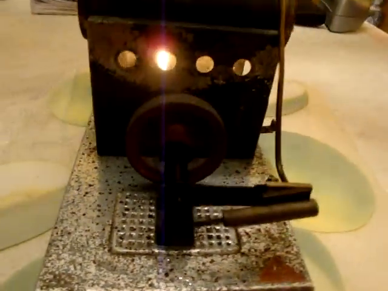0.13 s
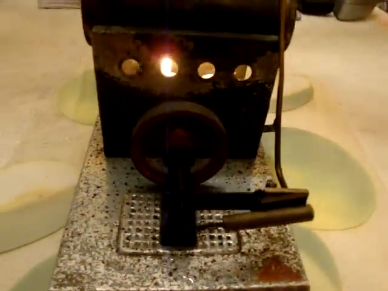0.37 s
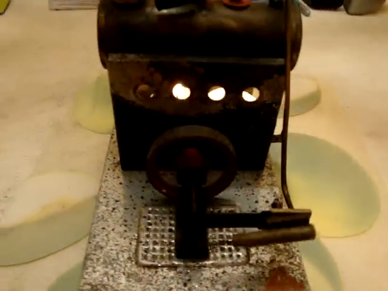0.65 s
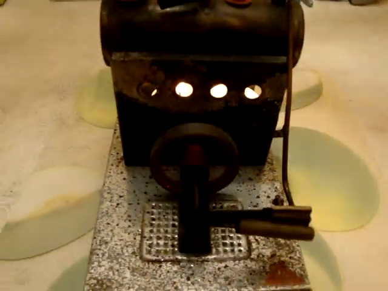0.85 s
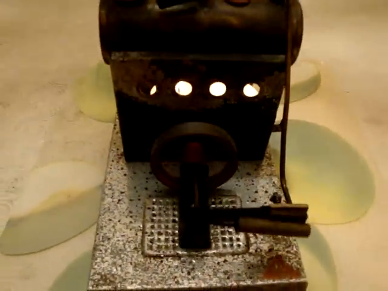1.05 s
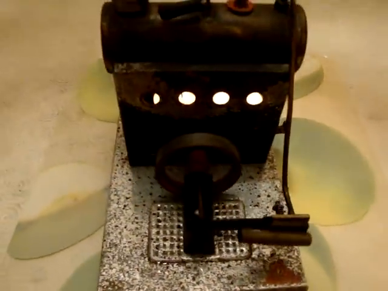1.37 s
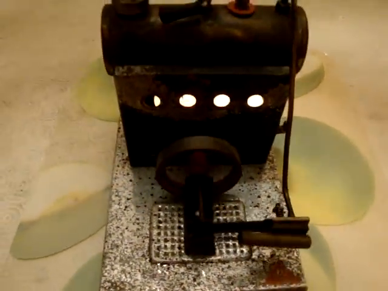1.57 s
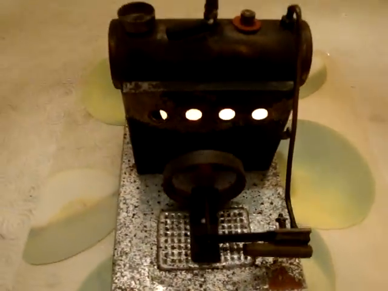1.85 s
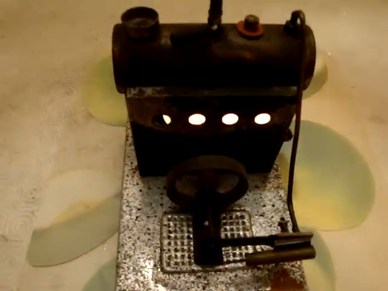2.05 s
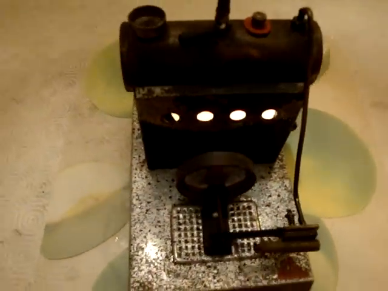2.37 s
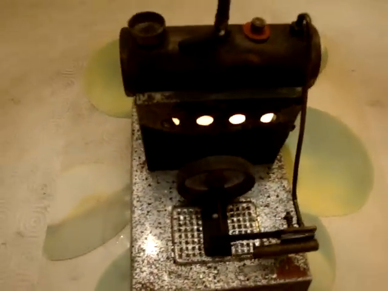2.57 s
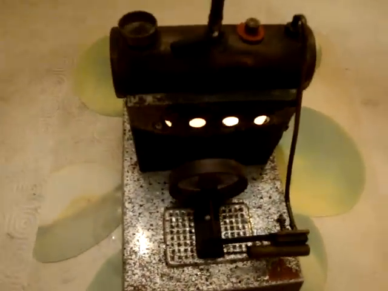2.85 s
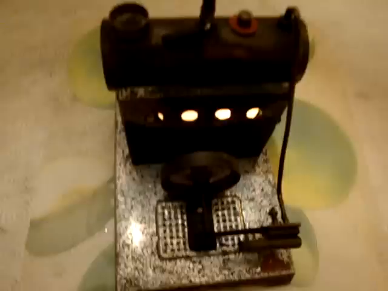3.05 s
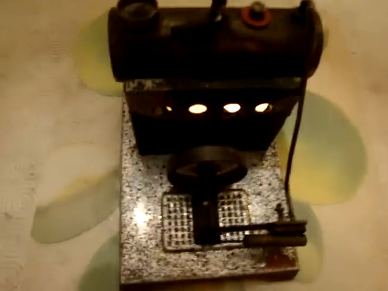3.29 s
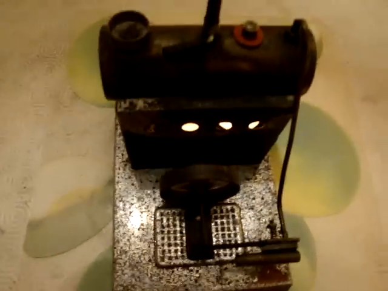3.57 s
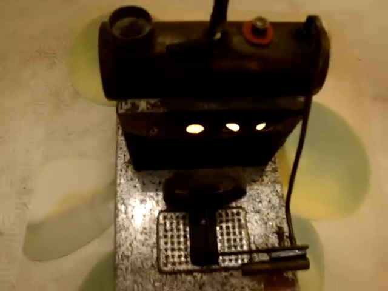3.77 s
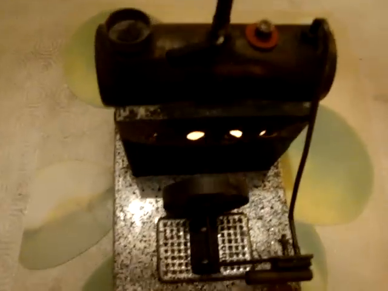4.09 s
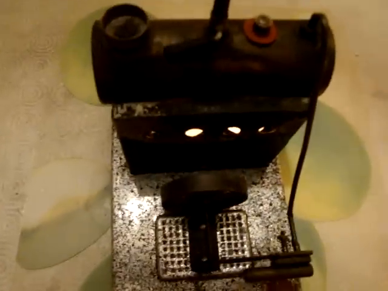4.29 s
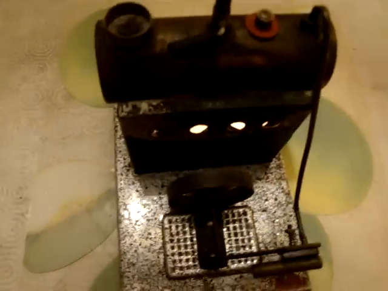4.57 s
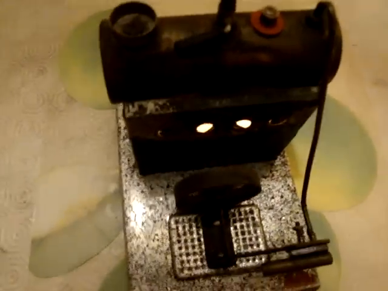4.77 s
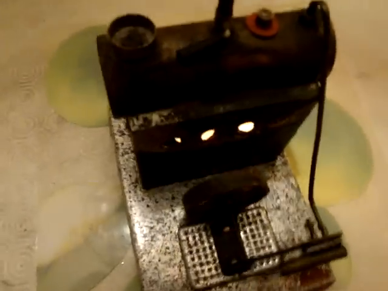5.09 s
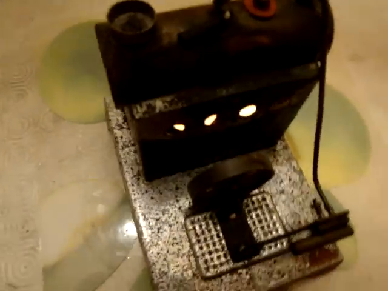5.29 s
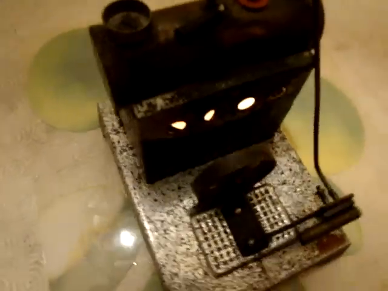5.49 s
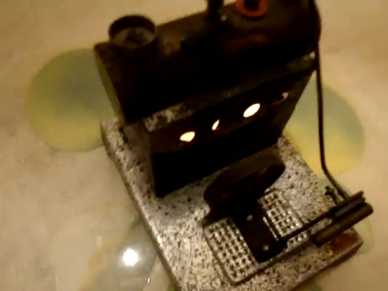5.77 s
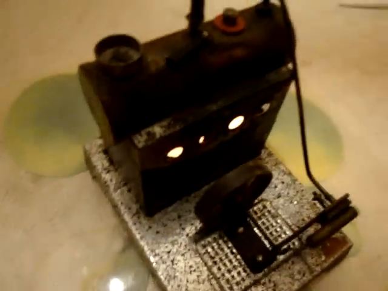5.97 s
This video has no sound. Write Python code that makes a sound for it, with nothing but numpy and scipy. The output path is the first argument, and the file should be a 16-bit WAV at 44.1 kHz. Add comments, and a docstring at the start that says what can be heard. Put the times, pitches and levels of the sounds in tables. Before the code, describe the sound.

Close, dry-sounding chatter of a little tin steam engine: about eight and a half sharp chuffs a second, rising gradually past nine. Wet, spluttery and clanky at first, softer steam in the middle, then stronger, brighter spits and ringing metal knocks from about four seconds. Scraping and slack rattling fill the gaps, over thin hiss and quiet low rumble in a small room.

```python
"""A toy steam engine on a table, heard from close by in a small room, turning 8.6 times a second at first.
From the start slack joints clack and scrape, ringing the tin; water splutters; hiss and rumble lie behind.
Then on each turn the port of the rocking cylinder spits steam (shaped noise), puffs out the rest, and the
piston knocks the loose crank, ringing base and firebox (decaying sines). Dull bumps come from one second on,
softer return pings from one and a half; a ringing cylinder wall peaks near four; at the end 9.6 turns a second."""
import sys
import numpy as np
from scipy import signal
from scipy.fft import rfft, irfft
from scipy.io import wavfile

SR = 44100
rng = np.random.default_rng(int(sys.argv[2]) if len(sys.argv) > 2 else 0)


def waveform_to_disk(signal):
    """Save audio, clipped to [-1, 1], as 16-bit WAV at the path in sys.argv[1]."""
    frames = np.transpose(np.atleast_2d(signal))
    scaled = np.clip(frames, -1, 1) * 32767
    samples = np.round(scaled).astype(np.int16)
    wavfile.write(sys.argv[1], SR, samples)


N = 270765
TIME = np.arange(N) / SR

# Flywheel speed. Each row: time in seconds, turns per second.
SPEED = [(0, 8.568), (.6, 8.657), (1.2, 8.766), (2.2, 8.972), (3.2, 9.102), (4, 9.249), (4.8, 9.209),
         (6.14, 9.556)]
FIRST_PORT_S = .0876   # the port first opens; turns are counted from here

# Tin base plate, firebox and boiler modes. Each row: pitch in Hz, width in Hz, relative level in dB.
TIN_MODES = [(670, 130, -12), (704, 20, -14.5), (973.7, 45.5, 1), (1047, 47, -10), (1112, 60, -4.5),
             (1446, 66, -9.5), (1530, 800, -28), (1521, 93, -6), (1628, 87, -3.5), (2000, 152, -8.5),
             (2164, 82, -12.5), (2424, 71, -12.5), (2680, 270, -16), (2930, 54, -19), (3446, 54, -19.5),
             (4220, 67, -31), (4240, 170, -41.5), (5300, 550, -41), (5330, 63, -45.5), (6130, 35, -40)]
# Pitches at which the plates cancel each other. Each row: pitch in Hz, width in Hz, depth in dB.
HOLLOWS = [(1867, 154, -16), (3125, 460, -5.5)]

# Friction round the turn. Each row: share of a turn after the port opens, dB at the start,
# dB towards which it moves with speed.
CRANK_FRICTION = [(0, 2, 3), (0.099, -3, 2.5), (0.201, -1.5, 1.5), (0.258, 0, -7), (0.317, 0, -3.5),
                  (0.437, 0.5, -1.5), (.54, -5, -6), (.63, -3.5, -8.5), (0.721, 1.5, -4.5),
                  (0.799, -5.5, 3), (0.869, -7, 3.5), (.94, -4, -6)]
# Rubbing of the cylinder face and bearings. Each row: time in seconds, level in dB before filtering.
RUBBING = [(0, -44.5), (1.1, -40.5), (2, -41.5), (3, -41.5), (4, -40), (5, -39), (6.14, -42)]
CLUMP_S, CLUMP_DB = .004, 7   # length and swing of the bunches of slips
SLIPS_PER_S, SLIP_SPREAD_DB = 1300, 16   # mean rate and spread of sizes

# Colour of the wet sputter. Each row: pitch in Hz, relative density in dB per Hz.
SPUTTER_COLOUR = [(1500, 11), (2400, 15.5), (3300, 9.5), (4400, 5), (5800, 0.5), (7500, -2), (10000, -25)]
# Slugs of water from the port face. Each row: time of the peak in seconds, level in dB before the
# crackle, fall in seconds.
WATER_SLUGS = [(0.012, -35, 0.0018), (0.083, -36, 0.0027), (0.183, -38, 0.0029), (0.211, -45, 0.0026),
               (0.229, -51, 0.002), (0.244, -33, 0.002), (0.342, -34.5, 0.0026), (0.459, -39, 0.0022),
               (0.574, -35.5, 0.0037), (0.677, -42, 0.0047), (0.694, -45, 0.0022), (0.706, -34.5, 0.0026),
               (0.809, -42, 0.0012), (0.878, -36, 0.0017), (1.035, -41, 0.0028), (1.151, -35, 0.0021),
               (1.265, -38.5, 0.0022), (1.279, -38, 0.0027), (1.338, -37, 0.0016), (1.563, -35, 0.0013),
               (1.719, -37, 0.0016), (1.926, -54, 0.005), (4.021, -32.5, 0.0023), (4.113, -33, 0.002),
               (4.126, -34, 0.0031), (4.21, -40.5, 0.0016), (4.222, -41, 0.0024), (4.343, -41, 0.0035),
               (4.716, -54, 0.0018), (4.767, -34, 0.0028), (4.777, -24.5, 0.0024), (4.86, -35.5, 0.0033),
               (5.214, -47, 0.0026), (5.398, -51, 0.0014), (5.927, -50, 0.0016)]

# Colour of the boiler hiss. Each row: pitch in Hz, relative density in dB per Hz.
BOILER_COLOUR = [(1500, 26), (2500, 32.5), (4000, 21.5), (6000, -10), (8000, -21), (10000, -13)]
# Boiler hiss. Each row: time in seconds, level in dB before a gain that depends on the crank angle.
BOILER_HISS = [(0, -69), (1.1, -58.5), (3, -58), (4, -56.5), (6.14, -59)]
# Colour of the thin background hiss. Each row: pitch in Hz, relative density in dB per Hz.
THIN_HISS_COLOUR = [(3000, 0), (10000, -1), (11000, -40)]
THIN_HISS_DB = -63.5   # before it wavers
WAVER_DB, WAVERS_PER_S = 1.8, 70   # scale and rate of the thin hiss's wavering

# Colour of the table's drone. Each row: pitch in Hz, relative density in dB per Hz.
DRONE_COLOUR = [(52, -7.5), (72, 8), (95, -8), (120, 5.5), (170, -11.5), (300, -11), (600, -49)]
# Level of the drone in dB, when slow and at full speed.
DRONE_DB = (-82, -69.5)
# Colour of the room's rumble. Each row: pitch in Hz, relative density in dB per Hz.
RUMBLE_COLOUR = [(25, -27), (45, -22.5), (58, -11), (75, -8), (95, -14), (120, -5), (180, -3.5),
                 (240, -2.5), (282, 6), (330, -0.5), (376, 0.5), (440, -1), (600, 0), (1200, -45.5)]
RUMBLE_DB = -57.5

# Light clacks of the slack joints, at the same places in every turn. Each row: share of a turn,
# ring in dB slow, ring in dB fast, clank in dB slow, clank in dB fast.
LIGHT_CLACKS = [(.195, -41.5, -34, -32.5, -46), (.28, -39.5, -47.5, -38, -46), (.675, -60, -43, -54, -40),
                (.76, -52, -36, -59, -38.5), (.828, -55, -38, -35, -41.5), (.9, -30, -41, -38.5, -38)]
# Hard clacks of the slack joints. Each row: time in seconds, ring in dB, clank in dB.
HARD_CLACKS = [(0.0275, -35.5, -41), (0.0762, -33, -32.5), (0.1092, -36, -32), (0.1668, -50.0, -31.0),
               (0.1833, -46, -37), (0.1922, -35, -29), (0.2283, -46, -28), (0.2435, -46, -35),
               (0.2606, -35, -41), (0.3085, -38, -28.5), (0.3425, -33, -31), (0.3995, -50.0, -31),
               (0.4242, -39, -23), (0.4582, -50.0, -35), (0.4929, -34.0, -46), (0.5121, -36, -32.5),
               (0.5221, -38.0, -50.0), (0.5401, -37, -28), (0.5744, -32, -30), (0.5835, -42, -40),
               (0.6303, -42, -30.5), (0.6383, -36, -50.0), (0.6552, -38.0, -37), (0.6911, -43, -33),
               (0.6999, -39, -38), (0.7246, -35, -35), (0.7705, -39, -34.0), (0.8053, -35, -31.0),
               (0.8139, -44, -42.0), (0.8612, -36, -36), (0.8749, -44, -38.0), (0.8852, -37, -33),
               (1.0002, -29, -34), (1.0343, -36, -28.5), (1.0906, -38, -32), (1.1025, -52, -31),
               (1.1151, -30, -31), (1.1617, -35, -36), (1.2319, -31.5, -48), (1.2636, -39, -31),
               (1.3187, -31.5, -33), (1.3348, -36, -27), (1.3431, -41.0, -37), (1.3724, -39, -37),
               (1.3879, -44, -38.0), (1.4111, -39, -50.0), (1.4569, -46, -33.0), (1.4905, -42, -32.0),
               (1.5456, -52, -33), (1.5549, -36, -45), (1.5696, -44, -35.0), (1.6142, -53, -36.5),
               (1.6554, -48, -36), (1.67, -50.0, -44), (1.6823, -40, -31.0), (1.7168, -37, -30.5),
               (1.7254, -40, -50.0), (1.7719, -38.0, -31), (1.795, -51, -30.5), (1.9416, -36, -30),
               (1.9531, -30.5, -50.0), (1.9947, -46, -34), (2.0224, -31, -50.0), (2.0631, -48, -33),
               (2.1048, -47, -36), (2.1327, -37, -47), (2.1657, -52, -33), (2.1901, -39, -50.0),
               (2.2446, -37, -50.0), (2.3314, -38, -50.0), (2.3539, -34, -32), (2.4659, -36, -41),
               (2.5006, -53, -35), (2.6619, -51, -36.5), (2.6869, -49, -37.0), (2.7224, -32, -50.0),
               (2.7727, -39, -38), (2.7973, -37, -39.0), (2.8321, -36, -40.0), (2.8559, -35, -50.0),
               (2.8823, -45, -36), (2.9419, -45, -33), (2.9508, -33, -54), (2.9658, -41, -53),
               (3.0051, -37.0, -50.0), (3.0522, -38, -40.0), (3.115, -39, -52), (3.1722, -34.0, -46),
               (3.2119, -48, -39), (3.2372, -46, -32), (3.2717, -34, -50.0), (3.2784, -31, -50.0),
               (3.3408, -35, -37), (3.3892, -33, -38), (3.4312, -44.0, -37), (3.4877, -41, -57),
               (3.498, -39, -56), (3.5508, -37, -53), (3.5593, -39, -31), (3.5955, -31, -52),
               (3.6078, -33, -50.0), (3.6511, -42, -42), (3.6731, -43.0, -33), (3.7039, -35, -38),
               (3.7671, -33, -50.0), (3.7759, -33, -34), (3.8754, -32, -48), (3.8872, -35, -30.5),
               (3.9331, -31, -48), (3.9834, -35, -54), (3.9924, -30.0, -33), (4.0394, -39, -40.5),
               (4.0544, -32, -43.0), (4.0976, -32, -31), (4.1519, -34.5, -50.0), (4.195, -49.5, -34),
               (4.2077, -32.0, -28.5), (4.214, -30.5, -39), (4.2452, -34, -47), (4.2541, -36, -50.0),
               (4.265, -29.5, -47), (4.31, -36, -47), (4.3285, -33, -41), (4.4213, -49, -39),
               (4.4644, -34.0, -52), (4.4721, -35.0, -47), (4.5341, -28, -33), (4.5458, -34.0, -48),
               (4.5845, -36, -41), (4.6479, -36, -33), (4.6908, -35, -52), (4.7426, -34, -46),
               (4.7611, -32, -38), (4.8011, -32, -50.0), (4.8553, -29, -42), (4.8682, -28, -32),
               (4.909, -39, -37), (4.9503, -38, -35), (5.0679, -29, -50.0), (5.0784, -28.0, -37),
               (5.1141, -36.0, -45), (5.1233, -35.5, -48), (5.1364, -38, -46), (5.1832, -33, -36),
               (5.2203, -33, -42), (5.2336, -33.5, -43), (5.2745, -35, -42), (5.2897, -33, -35),
               (5.3517, -31, -50.0), (5.3899, -33, -36.0), (5.3974, -36, -29), (5.5037, -32, -30.5),
               (5.5415, -35, -50.0), (5.5525, -37, -37.0), (5.5655, -31, -50.0), (5.6045, -39, -35.0),
               (5.6119, -27, -49), (5.6481, -30, -50.0), (5.7103, -36.0, -33), (5.7174, -27, -31.0),
               (5.7287, -45, -35), (5.7641, -47, -50.0), (5.8235, -27, -36), (5.9217, -37.0, -36),
               (5.9287, -26.5, -32), (5.975, -39, -52), (5.9892, -35, -50.0), (6.0336, -24.0, -32),
               (6.0811, -33.5, -46), (6.134, -30, -30)]

# Colour of the gasp as the port closes. Each row: pitch in Hz, relative density in dB per Hz.
GASP_COLOUR = [(2000, -8), (2800, 3.5), (3600, -3), (4500, -6.5), (7000, -9.5)]

# Power strokes. Each row: port opening in seconds, steam rush in dB, steam sizzle in dB, the piston's wait
# in seconds, thud in dB, ring in dB, clank in dB, rebound in dB, rebound delay in seconds.
STROKES = [(0.087, -19.5, -23.5, 0.0015, -23, -54, -17.0, -30.5, 0.00476),
           (0.2048, -18, -24, 0, -46, -40, -20, -25, 0.0048),
           (0.319, -22.5, -25, 0.0013, -23, -34, -21.5, -28.5, 0.00511),
           (0.4353, -23, -24.5, 0.0032, -40.0, -30, -25, -29, 0.00494),
           (0.5512, -27.0, -30.5, 0.0043, -39, -26.5, -23.5, -34, 0.00511),
           (0.6682, -21.5, -32, 0.00075, -25, -36, -24, -30, 0.00505),
           (0.7818, -26, -30.5, 0.0018, -28, -27.0, -27, -32, 0.0049),
           (0.8973, -27, -29.5, 0.0015, -42, -28.5, -22.5, -32, 0.00501),
           (1.0124, -25.5, -28.5, 0.0015, -47, -27.5, -29, -30, 0.00484),
           (1.1278, -29.5, -35, 0.0012, -22, -25, -34, -30, 0.00511),
           (1.2409, -26.5, -30.5, 0.0068, -43, -29, -33, -33, 0.00664),
           (1.354, -28, -33.5, 0.0025, -30, -32, -24.5, -37, 0.00535),
           (1.4682, -26, -31.5, 0.0, -27.0, -30.5, -33, -29.5, 0.00529),
           (1.5809, -28.5, -28.5, 0.0011, -22, -35, -24.5, -36, 0.00539),
           (1.694, -28, -27.5, 0.00041, -42, -27, -31.0, -26.0, 0.00535),
           (1.807, -29.0, -30.5, 0.0, -24, -27, -28.5, -28, 0.00456),
           (1.9194, -27.5, -27, 0.00049, -38, -23.5, -23.5, -33, 0.00535),
           (2.0313, -27, -28.5, 0, -37, -24.5, -24, -24.5, 0.00515),
           (2.1432, -31.0, -28, 0, -36, -23, -28, -23.5, 0.00535),
           (2.2552, -27, -28, 0, -27, -25, -30.0, -29.5, 0.00515),
           (2.3664, -33.0, -33, 0.00074, -42, -26.5, -27.5, -29.5, 0.00724),
           (2.477, -38, -28.5, 0.0032, -30.0, -22, -26, -32, 0.00525),
           (2.588, -34.0, -32, 0.0018, -22, -25, -29, -40, 0.00535),
           (2.6996, -33.0, -29, 0.0013, -26.0, -28.5, -25.5, -32, 0.00475),
           (2.8092, -31, -25, 0.0027, -33, -22.5, -24, -47, 0.00539),
           (2.92, -28.5, -27, 0.0038, -40.0, -25, -25.5, -37, 0.00535),
           (3.03, -31, -28.5, 0.0024, -24, -29.5, -27.0, -27.5, 0.00576),
           (3.1402, -27.5, -28, 0.0038, -29.5, -26, -28.5, -31, 0.0063),
           (3.25, -34, -30, 0.0036, -19, -33, -25, -29, 0.00664),
           (3.359, -31, -31, 0, -18, -25.5, -24.5, -41, 0.00529),
           (3.4675, -30, -29, 0.0018, -19.5, -32.0, -29.0, -26.5, 0.00674),
           (3.5773, -23, -24.5, 0.0028, -24, -22, -23.5, -34.5, 0.00519),
           (3.6857, -24.5, -26, 0.0028, -17.5, -24, -23.5, -36.5, 0.00476),
           (3.795, -22, -26, 0.0027, -34.5, -22.5, -25.5, -31, 0.00521),
           (3.9024, -24, -22.5, 0.00071, -14.5, -33, -22, -29.0, 0.00515),
           (4.0143, -21, -23, 0.0037, -35.0, -17.5, -27, -40, 0.00505),
           (4.1207, -18.5, -30, 0.0063, -40.0, -26.5, -33, -32, 0.00511),
           (4.227, -27, -30.5, 0.003, -24.5, -22.0, -20.5, -29, 0.00484),
           (4.3356, -27.5, -23.5, 0.0021, -17.5, -19.5, -24, -30.5, 0.00525),
           (4.4445, -28.0, -28.5, 0.0016, -39, -27, -25.0, -31, 0.0065),
           (4.553, -24.5, -25, 0.0025, -15.5, -24.0, -24.5, -36, 0.00521),
           (4.6608, -27, -26, 0.0025, -19, -23.0, -23, -31, 0.0049),
           (4.772, -24, -20.5, 0.0018, -14, -19.5, -32, -39, 0.006),
           (4.8773, -25.5, -28.5, 0.0023, -21, -23, -29, -34, 0.00511),
           (4.9863, -21, -22.5, 0.0021, -40, -19.5, -24.5, -25.5, 0.0046),
           (5.093, -22, -24, 0.0037, -19, -27.0, -25.5, -37, 0.0049),
           (5.2007, -26, -24, 0.0039, -28, -19.5, -22, -24, 0.00484),
           (5.3078, -26, -26.5, 0.0031, -16.5, -21.5, -23.5, -31, 0.00539),
           (5.4162, -21.5, -26, 0.0031, -42, -21, -25, -31, 0.00529),
           (5.5224, -30, -25.5, 0.0027, -22.5, -20.0, -21.5, -20, 0.00555),
           (5.6298, -25, -24, 0.0019, -40.0, -23, -22.5, -31, 0.00539),
           (5.7352, -22, -23.5, 0.0019, -40.0, -21, -21.5, -22.0, 0.0063),
           (5.8411, -29, -35, 0.0028, -29, -22.5, -21.5, -31, 0.00535),
           (5.947, -23.0, -28.5, 0.003, -41, -26, -22.5, -25.5, 0.00535),
           (6.0512, -24.5, -26.5, 0.004, -40.0, -25, -23.5, -23, 0.00586)]
# Bounces of the piston after each knock. Each row: multiple of the rebound delay, dB added to the rebound.
BOUNCES = [(.6, -10), (1, -4), (1.4, -6.5)]
# Colour of the early steam spit. Each row: pitch in Hz, relative density in dB per Hz.
SPIT_EARLY_COLOUR = [(500, 5.5), (1200, 9.5), (2500, 4), (4400, -3), (5800, 6), (7000, -2), (8200, -3)]
# Colour of the later steam spit. Each row: pitch in Hz, relative density in dB per Hz.
SPIT_LATE_COLOUR = [(500, 9.5), (1200, 20.5), (2500, 7), (3100, -6.5), (3500, 5.5), (4500, -8),
                    (5800, -14.5), (7000, 3.5), (8300, 11.5), (9000, 0.5)]
SIZZLE_HZ = 6500   # rush lies below, sizzle above
# Ringing of the cylinder wall under the jet. Each row: time in seconds, gain in dB.
WALL_RING = [(0, -46), (3, -39), (4.1, -21), (4.8, -25), (6.14, -45)]
# Colour of the exhaust puff. Each row: pitch in Hz, relative density in dB per Hz.
PUFF_COLOUR = [(1300, 1), (1600, -1), (2000, 11), (2500, 7), (3100, 4.5), (3550, 5.5), (4400, -2),
               (7000, -13.5), (10000, -46), (12000, -46)]

# Dull bumps. Each row: time in seconds, strength in dB, pitch in Hz.
BUMPS = [(1.058, -31.5, 420), (1.208, -41, 398), (2.264, -38.5, 440), (4.047, -42.5, 393)]
# What a bump rings with. Each row: multiple of its pitch, width in Hz, relative level in dB.
BUMP_MODES = [(.7, 69, -1.5), (.82, 34.7, 1), (.98, 160, 9), (1.15, 70, 4)]
# Knocks as the piston reverses, about half a turn after the port. Each row: time in seconds,
# ring in dB, clank in dB.
RETURNS = [(1.526, -52, -57), (1.6372, -39, -55), (1.751, -35, -46.0), (1.8617, -28.5, -52),
           (1.9758, -29.5, -47), (2.0867, -36.5, -46), (2.1989, -38, -45), (2.3105, -29.5, -56),
           (2.42, -27.5, -53), (2.5331, -33.5, -39), (2.643, -38, -47), (2.754, -30, -52),
           (2.8637, -27, -54), (2.9752, -30.0, -50.0), (3.0848, -30.5, -49), (3.1948, -30.5, -48),
           (3.304, -29, -44), (3.4133, -29.5, -50.0), (3.5232, -30.5, -50.0), (3.6315, -30.5, -54),
           (3.7394, -29.5, -54), (3.8475, -30.0, -57), (3.9576, -32, -42), (4.0695, -44.0, -32),
           (4.174, -36, -52), (4.2805, -29.0, -36), (4.3878, -26.5, -50.0), (4.498, -28.5, -45),
           (4.605, -24.0, -50.0), (4.7126, -26.0, -32), (4.8258, -28, -27.5), (4.9297, -27.5, -50.0),
           (5.041, -33, -50.0), (5.1463, -30.0, -48), (5.2537, -26.5, -52), (5.3617, -35, -52),
           (5.4674, -30.5, -52), (5.574, -28, -50.0), (5.6808, -29.0, -49), (5.7875, -27, -49),
           (5.8937, -34, -43), (5.9985, -33, -36), (6.1033, -29.5, -42)]

# Table top and nearby wall. Each row: delay in seconds, level in dB before the dulling.
ECHOES = [(.0021, -17.5), (.007, -31.5)]
ROOM_T60_S = 0.45
CUTOFF_HZ = 10000


def from_db(db):
    """Decibels to gain."""
    return 10 ** (np.asarray(db) / 20)


def rms_one(x):
    """Scale to unit rms."""
    return x / np.sqrt(np.mean(x ** 2) + 1e-20)


def noise(colour):
    """Unit noise of the given colour, falling away below its first pitch."""
    hz, level_db = np.transpose(colour)
    bins = np.maximum(np.arange(N // 2 + 1) * SR / N, 1)
    gain = from_db(np.interp(np.log(bins), np.log(hz), level_db))
    gain = gain * np.minimum(bins / hz[0], 1) ** 2
    return rms_one(irfft(rfft(rng.standard_normal(N)) * gain, N))


def vary(spread_db, count):
    """Chance differences from turn to turn, within the given spread."""
    return spread_db * (2 * rng.random(count) - 1)


def follow(curve, times):
    """Each column of a curve, read at the given times."""
    s, *columns = np.transpose(curve)
    return np.array([np.interp(times, s, column) for column in columns])


def flywheel():
    """Turns made since the port first opened: the running sum of the speed."""
    turns = np.cumsum(follow(SPEED, TIME)[0]) / SR
    return turns - np.interp(FIRST_PORT_S, TIME, turns)


def with_speed(slow, fast, times):
    """Glide from the slow value to the fast one as the flywheel speeds up."""
    return np.interp(follow(SPEED, times)[0], [SPEED[0][1], SPEED[-1][1]], [slow, fast])


def each_turn(turns, share, jitter_s):
    """The moments, a little scattered, at which the crank passes a given share of its turn."""
    times = TIME[1:][np.diff(np.floor(turns - share)) > 0]
    return times + jitter_s * rng.standard_normal(len(times))


def clicks(times, sizes):
    """Single-sample blows."""
    out = np.zeros(N)
    samples = np.clip(np.round(times * SR).astype(int), 0, N - 1)
    np.add.at(out, samples, sizes)
    return out


def ring(force, hz, width_hz):
    """A resonance: a unit blow sets a decaying sine of starting height 1 ringing."""
    radius, angle = np.exp(-np.pi * width_hz / SR), 2 * np.pi * hz / SR
    feedback = [1, -2 * radius * np.cos(angle), radius * radius]
    return signal.lfilter([0, np.sin(angle)], feedback, force + 1e-18)


def strike(times, thud_db, ring_db, clank_db, scatter_db, smear_s):
    """Blows on the tin: low, middle and high modes take their own share; the highest rattle in a little late."""
    out = np.zeros(N)
    chance = rng.standard_normal((len(times), len(TIN_MODES)))
    delay = rng.random((len(times), len(TIN_MODES)))
    for k, (hz, width_hz, mode_db) in enumerate(TIN_MODES):
        blow_db = thud_db if hz < 760 else ring_db if hz < 1260 else clank_db
        arrival = times + smear_s * delay[:, k] * (hz > 1850)
        sizes = from_db(blow_db + mode_db + scatter_db * chance[:, k])
        out += ring(clicks(arrival, sizes), hz, width_hz)
    return out


def choke(times, hold_s, fade_s, depth_db):
    """Gain that falls shortly after each blow, when the parts bear on each other and damp the ring."""
    latest = np.maximum(np.searchsorted(times, TIME + .001) - 1, 0)   # reopens 1 ms ahead of the blow
    age = TIME - times[latest]
    return from_db(depth_db * np.clip((age - hold_s) / fade_s, 0, 1))


def crackle(depth_db):
    """Droplets in the steam make its strength jump from moment to moment."""
    steps = np.arange(0, N, SR // 2000)
    jumps = np.clip(rng.standard_normal(len(steps)), -1.2, 1.2)
    return rms_one(from_db(depth_db * np.interp(np.arange(N), steps, jumps)))


def splashes(times, levels_db, falls_s):
    """Envelope of short bursts that swell to their peak and die."""
    envelope, age = np.zeros(N), TIME[:SR // 15]
    for s, db, fall_s in np.broadcast(times, levels_db, falls_s):
        start = max(round((s - fall_s) * SR), 0)
        shape = age / fall_s * np.exp(1 - age / fall_s)
        envelope[start:start + len(age)] += from_db(db) * shape[:N - start]
    return envelope


def crank_friction(turns):
    """Friction gain, following the crank angle; its pattern shifts with speed."""
    share, slow_db, fast_db = np.transpose(CRANK_FRICTION)
    slow = np.interp(turns, share, slow_db, period=1)
    fast = np.interp(turns, share, fast_db, period=1)
    return from_db(slow + (fast - slow) * with_speed(0, 0.88, TIME))


def clumps():
    """Dry surfaces catch and let go, so their slips come in bunches."""
    steps = np.arange(0, N, round(CLUMP_S * SR))
    swing = np.interp(np.arange(N), steps, rng.uniform(-1.3, 1, len(steps)))
    return rms_one(from_db(CLUMP_DB * swing))


def scrape(friction, earliness, tilt_db, early_tilt_db):
    """Tiny slips of the cylinder face and bearings excite the tin; their colour shifts with time."""
    sizes = rng.choice([-1, 1], N) * from_db(SLIP_SPREAD_DB * rng.random(N))
    slips = rng.random(N) < SLIPS_PER_S / SR
    force = slips * sizes * friction * clumps()
    out = np.zeros(N)
    for hz, width_hz, mode_db in TIN_MODES:
        octaves = np.log2(hz / TIN_MODES[3][0])
        gain = from_db(mode_db + octaves * (tilt_db + early_tilt_db * earliness))
        out += gain * ring(force, hz, width_hz)
    return from_db(follow(RUBBING, TIME)[0]) * rms_one(out)


def wet_sputter(friction, earliness):
    """Condensed water sputters from the port face, dying down with time as the cylinder warms."""
    return from_db(-46.5) * earliness * friction ** 3.4 * crackle(depth_db=13) * noise(SPUTTER_COLOUR)


def boiler_hiss(crank_gain):
    """A faint hiss of leaking steam: coloured noise."""
    return from_db(follow(BOILER_HISS, TIME)[0]) * crank_gain ** 1.4 * noise(BOILER_COLOUR)


def thin_hiss(turns):
    """A thin background hiss that wavers a little at random."""
    steps = np.arange(0, N + SR, round(SR / WAVERS_PER_S))
    waver = np.interp(np.arange(N), steps, rng.uniform(-2.4, 1, len(steps)))
    cycle = np.sin(2 * np.pi * (turns - .15))
    return from_db(THIN_HISS_DB) * from_db(WAVER_DB * (cycle + waver)) * noise(THIN_HISS_COLOUR)


def drone():
    """The table drones low under the running engine, louder with speed."""
    return from_db(with_speed(*DRONE_DB, TIME)) * noise(DRONE_COLOUR)


def room_rumble():
    """Steady low noise of the room."""
    return from_db(RUMBLE_DB) * noise(RUMBLE_COLOUR)


def joints(turns, thud_db, spread_db):
    """The load reverses and pins fall across their holes: some hard, the rest lightly at set places in the turn."""
    hard = np.transpose(HARD_CLACKS)
    blows = [hard]
    for share, ring_slow, ring_fast, clank_slow, clank_fast in LIGHT_CLACKS:
        times = each_turn(turns, share, jitter_s=0.000977)
        luck = vary(spread_db, count=len(times))
        ring_db = with_speed(ring_slow, ring_fast, times) + luck
        clank_db = with_speed(clank_slow, clank_fast, times) + luck
        # a light clack gives way to a hard one within 5 ms
        clear = abs(times[:, None] - hard[0]).min(axis=1) > .005
        blows.append(np.array([times, ring_db, clank_db])[:, clear])
    times, ring_db, clank_db = np.hstack(blows)
    clacks = strike(times, ring_db + thud_db, ring_db, clank_db, scatter_db=3.0, smear_s=0.0026)
    return clacks * choke(np.sort(times), hold_s=0.0093, fade_s=0.0033, depth_db=-3.5)


def gasp(turns, share, slow_db, fast_db, fall_s):
    """A third of a turn after opening, the port closes and pinches off a softer gasp, never twice the same."""
    times = each_turn(turns, share, jitter_s=0.0025)
    levels_db = with_speed(slow_db, fast_db, times) + vary(2.4, count=len(times))
    return splashes(times, levels_db, fall_s) * noise(GASP_COLOUR)


def splutters():
    """Larger slugs of water are squeezed out of the port face in rough bursts."""
    return splashes(*np.transpose(WATER_SLUGS)) * crackle(depth_db=11.0) * noise(SPUTTER_COLOUR)


def spit(ports, rush_db, sizzle_db, earliness, rise_s, fall_s):
    """A short burst of wet steam as the port opens; rush and sizzle balance differently on every stroke."""
    envelopes, age = np.zeros((2, N)), TIME[:SR // 10]
    shape = np.minimum(age / rise_s, 1) ** 2 * np.exp(-np.maximum(age - rise_s, 0) / fall_s)
    for s, *levels_db in zip(ports, rush_db, sizzle_db):
        start = round((s - 0.71 * rise_s) * SR)
        envelopes[:, start:start + len(age)] += np.outer(from_db(levels_db), shape[:N - start])
    jet = np.sqrt(earliness) * noise(SPIT_EARLY_COLOUR) + np.sqrt(1 - earliness) * noise(SPIT_LATE_COLOUR)
    rush = signal.sosfiltfilt(signal.butter(6, SIZZLE_HZ, fs=SR, output="sos"), jet)
    sizzle = jet - rush
    return (envelopes[0] * rush + envelopes[1] * sizzle) * crackle(depth_db=3.2)


def wall_ring(steam):
    """The jet sets the cylinder's thin wall ringing at one pitch."""
    return from_db(follow(WALL_RING, TIME)[0]) * ring(steam, hz=3540, width_hz=98)


def piston(ports, waits_s, knock_db, rebound_db, delays_s, thud_db, clank_db):
    """Steam drives the piston across the crank's play; duller bounces keep the plate singing, then it seats."""
    times = ports + waits_s
    blows = strike(times, *knock_db, scatter_db=1.5, smear_s=0.00295)
    for multiple, bounce_db in BOUNCES:
        ring_db = rebound_db + bounce_db
        blows = blows + strike(times + multiple * delays_s, ring_db + thud_db, ring_db, ring_db + clank_db,
                               scatter_db=2.0, smear_s=0.0024)
    return blows * choke(times, hold_s=0.016, fade_s=0.001, depth_db=-26.0)


def exhaust(ports, levels_db, after_s, fall_s, tail_db):
    """The rest of the steam leaves in a rough, duller puff just behind each spit."""
    puffs = splashes(ports + after_s, levels_db + tail_db, fall_s)
    return puffs * crackle(depth_db=2.5) * noise(PUFF_COLOUR)


def bumps(contact_hz):
    """Soft, low knocks: a few close modes in alternating sign, held to a low band."""
    out = np.zeros(N)
    for s, db, hz in BUMPS:
        for k, (ratio, width_hz, mode_db) in enumerate(BUMP_MODES):
            blow = clicks(np.array([s]), from_db(db + mode_db))
            out += ring(blow, hz * ratio, width_hz) * (-1) ** k
    return signal.sosfilt(signal.butter(2, [200, contact_hz], "band", fs=SR, output="sos"), out)


def return_stroke(thud_db):
    """At the far end of its travel the piston knocks again: a soft ping with little thud or clank."""
    times, ring_db, clank_db = np.transpose(RETURNS)
    pings = strike(times, ring_db + thud_db, ring_db, clank_db, scatter_db=1.0, smear_s=0.0024)
    return pings * choke(times, hold_s=.007, fade_s=.004, depth_db=-9)


def disperse(x, slow_hz, count):
    """Bending waves carry the highs ahead of the lows, so a blow swells instead of snapping (all-passes)."""
    pole = np.exp(-2 * np.pi * slow_hz / SR)
    return signal.sosfilt(np.tile([-pole, 1, 0, 1, -pole, 0], (count, 1)), x)


def radiate(x, edge_hz):
    """Small plates and jets give off very little bass."""
    return signal.sosfilt(signal.butter(5, edge_hz, "high", fs=SR, output="sos"), x)


def hollow(x):
    """Broad dips between the groups of modes, where the plates cancel each other."""
    for hz, width_hz, depth_db in HOLLOWS:
        band = signal.lfilter(*signal.iirpeak(hz, hz / width_hz, fs=SR), x)
        x = x - (1 - from_db(depth_db)) * band
    return x


def room(x, wet_db, wall_hz):
    """Two near reflections and a short, dull tail."""
    age = TIME[:SR // 3]
    tail = rng.standard_normal(len(age)) * from_db(-60 * age / ROOM_T60_S) * (age > .008)
    response = from_db(wet_db) * tail / np.sqrt(np.sum(tail ** 2))
    for delay_s, echo_db in ECHOES:
        response[round(delay_s * SR)] += from_db(echo_db)
    response = signal.sosfilt(signal.butter(1, wall_hz, fs=SR, output="sos"), response)
    return x + signal.fftconvolve(x, response)[:N]


def scene():
    """The engine close by on its table, in its room."""
    turns = flywheel()
    friction = crank_friction(turns)
    earliness = 1 / (1 + (TIME / 1.42) ** 2)   # 1 at the start, falling with time
    ports, rush_db, sizzle_db, waits_s, *knock_db, rebound_db, delays_s = np.transpose(STROKES)

    tin = scrape(friction, earliness, tilt_db=4.0, early_tilt_db=-4.5)   # tilts in dB per octave
    tin = tin + joints(turns, thud_db=-0.5, spread_db=3.5)
    tin = tin + piston(ports, waits_s, knock_db, rebound_db, delays_s, thud_db=-22.0, clank_db=-18.0)
    tin = tin + return_stroke(thud_db=-16.0)
    tin = radiate(disperse(tin, slow_hz=2425, count=6), edge_hz=747)

    water = wet_sputter(friction, earliness) + splutters()
    steam = spit(ports, rush_db, sizzle_db, earliness, rise_s=0.0036, fall_s=0.0029)
    steam = steam + wall_ring(steam)
    steam = steam + gasp(turns, share=0.349, slow_db=-48, fast_db=-47, fall_s=0.0042)
    steam = steam + exhaust(ports, rush_db, after_s=0.008, fall_s=0.0065, tail_db=-20.5)

    near = hollow(tin + radiate(steam + water, edge_hz=623)) + bumps(contact_hz=710)
    background = boiler_hiss(friction) + thin_hiss(turns) + drone() + room_rumble()
    return (room(near, wet_db=-16.5, wall_hz=4100) + background)[None]


def record(dry):
    """The top is cut steeply."""
    return signal.sosfilt(signal.ellip(12, .2, 75, CUTOFF_HZ, fs=SR, output="sos"), dry)


dry = scene()
out = record(dry)
waveform_to_disk(out)
```